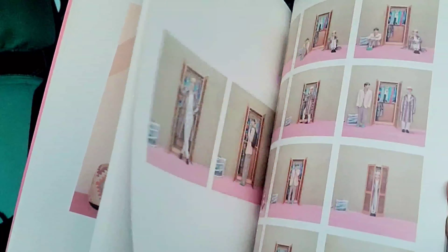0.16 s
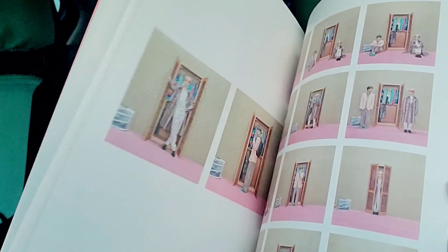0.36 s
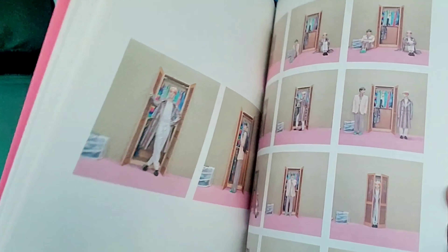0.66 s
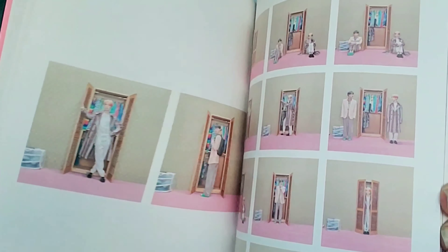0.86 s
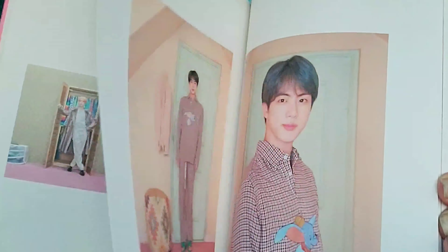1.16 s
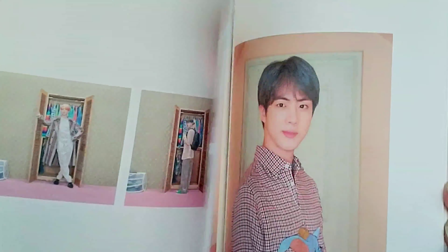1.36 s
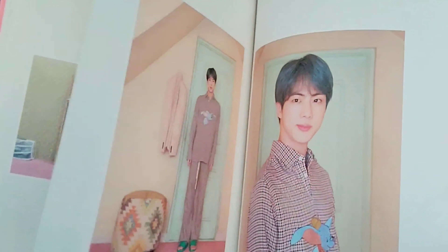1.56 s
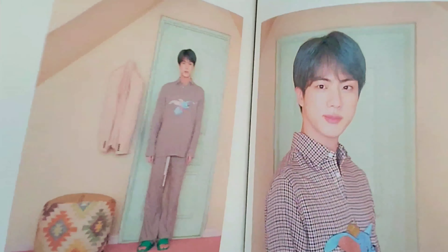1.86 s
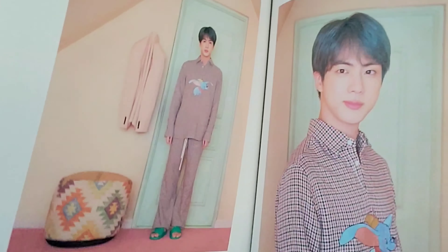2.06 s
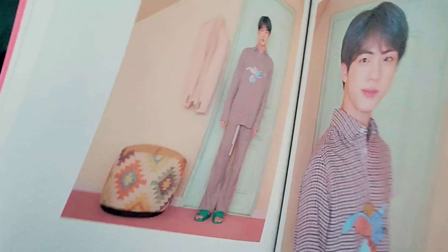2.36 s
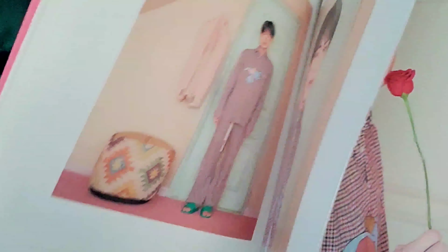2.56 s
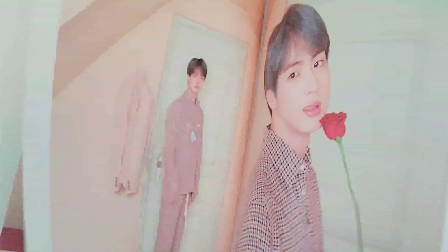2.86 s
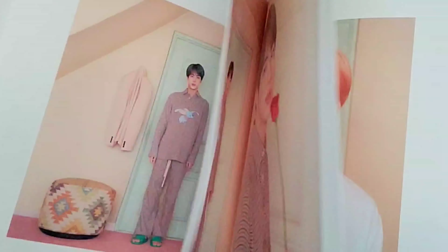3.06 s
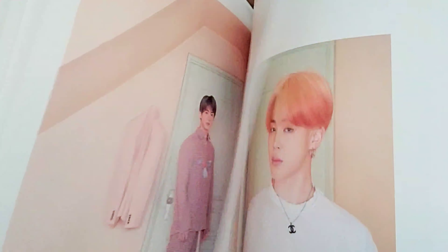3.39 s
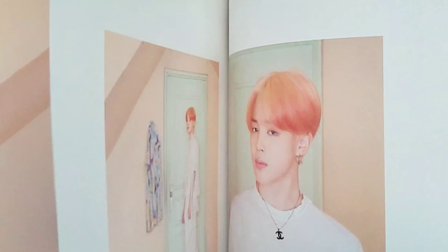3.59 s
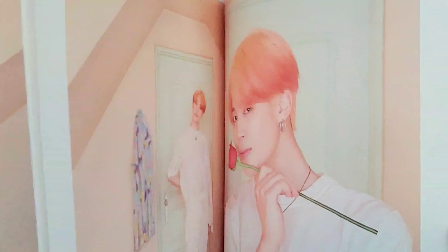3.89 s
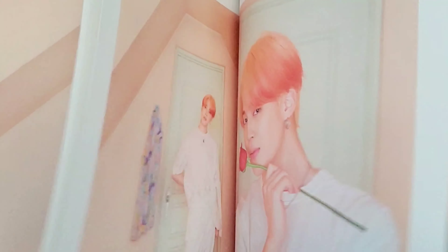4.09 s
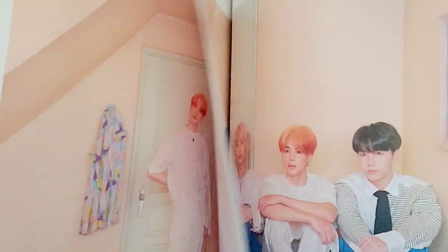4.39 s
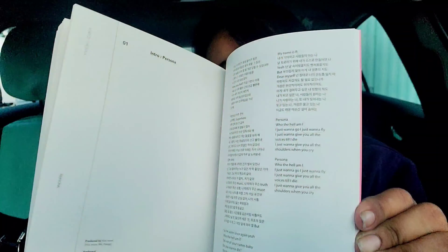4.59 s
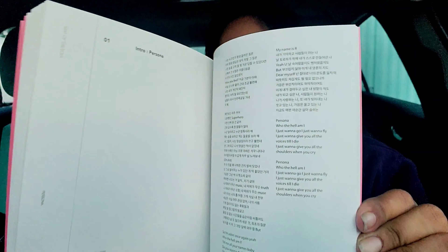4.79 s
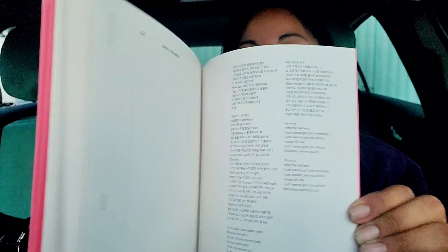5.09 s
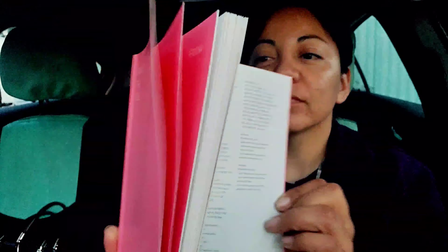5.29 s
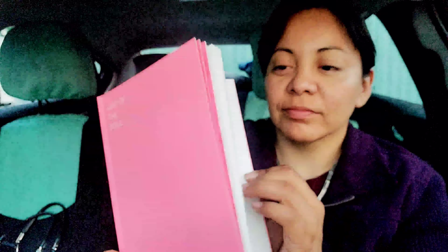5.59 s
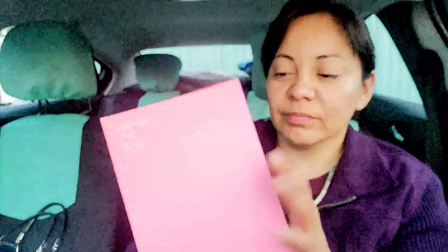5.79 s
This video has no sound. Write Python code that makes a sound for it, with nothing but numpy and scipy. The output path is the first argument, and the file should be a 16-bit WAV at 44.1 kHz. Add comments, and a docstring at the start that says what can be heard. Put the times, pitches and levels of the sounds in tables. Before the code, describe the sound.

Someone leafs through a book of thick, shiny paper right beside the microphone. Irregular swishes and rustles swell and fade, dotted with crisp clicks as pages buckle and low, soft thumps as they fall. A loud cluster of snaps comes near the middle, and a last slide and slap close the book. Behind it lies only the very faint steady noise of a parked car's interior.

```python
"""Stiff glossy book pages slide over a thumb and each other, close to a phone in a parked car.
The paper sticks and slips in tiny grains that make the sheet ring, hiss and sometimes rasp.
Pages click as they buckle, snap free and flop down, and the air they push thumps in the cabin.
Under it all lies a faint steady noise. The hits get a short padded echo, and the phone's two
microphone openings colour the left and right sides differently."""
import sys
import numpy as np
from scipy import signal
from scipy.fft import rfft, irfft, next_fast_len
from scipy.io import wavfile
from scipy.ndimage import uniform_filter1d, map_coordinates

SR = 44100
rng = np.random.default_rng(int(sys.argv[2]) if len(sys.argv) > 2 else 0)


def wav_record(signal):
    """Record a signal, one row per channel, as 16-bit PCM in the file named by sys.argv[1]."""
    frames = np.transpose(np.atleast_2d(signal))
    bounded = np.clip(frames, -1, 1)
    # unit amplitude maps onto the largest positive 16-bit level
    quanta = np.round(bounded * 32767).astype(np.int16)
    wavfile.write(sys.argv[1], SR, quanta)


N = 261954


def amp(db):
    """Turn decibels into a gain to multiply by."""
    return 10 ** (np.asarray(db) / 20)


def unit(x):
    """Scale x to an average (rms) level of 1."""
    return x / np.sqrt(np.mean(x ** 2) + 1e-20)


def along(points, hz):
    """Read between (frequency, value) points, with octaves evenly spaced."""
    freqs, values = np.transpose(points)
    return np.interp(np.log(hz + 1), np.log(freqs + 1), values)


def wobble(rate):
    """A smooth random curve through `rate` points a second."""
    return map_coordinates(rng.standard_normal(N // 40), [np.arange(N) * rate / SR])


def filtered(x, response):
    """Shape x with a filter, given as a function of frequency."""
    size = next_fast_len(N + SR // 2)
    return irfft(rfft(x, size) * response(np.fft.rfftfreq(size, 1 / SR)), size)[..., :N]


def resonances(table):
    """A filter that rings at each (pitch, width, level) row of a table."""
    return lambda f: sum((-1) ** k * amp(db) * 1j * f * width / (hz * hz - f * f + 1j * f * width)
                         for k, (hz, width, db) in enumerate(table))


def sides(db):
    """Left and right gains that make the left side louder by db."""
    return 2 / (amp(db / 2) + amp(-db / 2)) * amp(np.vstack([db, -db]) / 2)


def add_at(track, start_s, sound):
    """Mix a sound into a stereo track at a given time."""
    track[:, round(start_s * SR):][:, :sound.shape[-1]] += sound


def swells(peak_s, peak_db, rise_s, fall_s, rest_db):
    """A gain that climbs 20 dB in rise_s up to each peak and sinks 20 dB in fall_s after it."""
    steps = np.arange(0, N, 64)
    late_s = steps / SR - peak_s[:, None]
    drop_db = 20 * np.where(late_s < 0, -late_s / rise_s[:, None], late_s / fall_s[:, None])
    power = amp(2 * (peak_db[:, None] - drop_db)).sum(axis=0)
    return np.interp(np.arange(N), steps, np.sqrt(power + amp(2 * rest_db)))


# How alike the left and right sides sound: (frequency [Hz], likeness [0 to 1])
LIKENESS = [(60, 0.66), (290, 0.63), (640, 0.07), (1300, 0.52), (3100, 0.046), (6800, 0.029),
            (15000, 0.067)]

def grains(colour, spiky_db, clump_db, clumps_per_s, patchy_db):
    """Sticking and slipping: a dense stream of tiny, uneven kicks that come in clumps."""
    spikes = np.minimum(rng.exponential(size=N), 6.0)
    size = amp(spiky_db * spikes + clump_db * wobble(clumps_per_s))
    spectrum = signal.stft(size * rng.standard_normal((2, N)), nperseg=256)[2]
    # as the paper bends, patches of its spectrum swell and fade
    patches = uniform_filter1d(rng.standard_normal(spectrum.shape[1:]), size=2, axis=0)
    patches = uniform_filter1d(patches, size=16, axis=1)
    pair = signal.istft(spectrum * amp(patchy_db * unit(patches)), nperseg=256)[1][:, :N]
    spread = lambda hz: np.arccos(along(LIKENESS, hz)) / 2
    mid, side = filtered(pair, lambda hz: colour(hz) * [np.cos(spread(hz)), np.sin(spread(hz))])
    return np.array([mid + side, mid - side]) / np.sqrt(np.mean(mid ** 2 + side ** 2) * 0.81)


# The tone of the quiet car: (frequency [Hz], relative level [dB])
QUIET_TONE = [(15, -27.5), (25, -10), (64, -2), (180, -14.5), (242, -9.5), (405, -15.5), (531, -15),
              (1370, -24.5), (1700, -16.5), (2050, -18.5), (4030, -24.5), (7710, -33.5), (10100, -30),
              (14800, -23.5), (16000, -34)]

def quiet_cabin():
    """The faint steady noise of the cabin and the microphones."""
    noise = filtered(rng.standard_normal((2, N)), lambda hz: amp(along(QUIET_TONE, hz)))
    return amp(-79.5) * unit(noise)


# How fast the seats soak up sound: (frequency [Hz], time to fade by 60 dB [s])
ECHO_TIMES = [(100, 0.19), (1000, 0.035), (10000, 0.083)]

def cabin_echo(x):
    """The padded cabin adds a short echo, each frequency dying at its own speed."""
    hz, t, spectrum = signal.stft(rng.standard_normal((2, SR // 4)), SR, nperseg=256)
    fade = amp(-60 * t / along(ECHO_TIMES, hz)[:, None])
    tail = signal.istft(spectrum * fade, SR, nperseg=256)[1]
    delayed = np.pad(x, ((0, 0), (90, 0)))
    return signal.fftconvolve(delayed, tail / np.linalg.norm(tail[0]), axes=1)[:, :N]


# Where the cabin's air booms and a page trembles: (pitch [Hz], width [Hz], relative level [dB])
CABIN_BOOM = [(47.7, 37.5, -4.5), (56.4, 23.5, 1), (84.4, 16.8, -1.5), (121, 32, -6.5), (172.4, 44, -6.5)]
PAGE_FLUTTER = [(295.4, 190, -7.5), (393, 177, 1.5), (551, 250, -2), (758, 500, -4.5)]
# Puffs of air: (time [s], thump [dB], flutter [dB], thump's 20 dB fade time before limiting [s])
AIR_PUFFS = [(.1, -63, -91, 0.13), (0.347, -61, -66.5, 0.4), (0.485, -62, -56.5, 0.2),
             (0.556, -49, -59, 0.06), (.72, -79, -62.5, -0.34), (0.877, -62.5, -70, 0),
             (1.111, -58, -60.5, 0.18), (1.447, -56, -58.5, 0.23), (1.581, -59, -87, 0.15),
             (1.689, -52, -54, -0.02), (1.843, -52, -55, 0.14), (2.152, -69, -53.5, -0.25),
             (2.196, -58.5, -53.5, 0.07), (2.301, -64.5, -81, 0.2), (2.794, -76, -57.5, 0.07),
             (2.889, -47, -52, 0.21), (2.96, -61, -76, 0.3), (3.194, -59.5, -62.5, 0.37),
             (3.267, -41, -42.5, -0.03), (3.33, -38.5, -42, 0.0548), (3.69, -66, -78.5, 0.8),
             (3.871, -58, -76, -0.26), (4.1, -65.5, -73.5, 1.1), (4.179, -47.5, -51, -0.07),
             (4.33, -69, -59.5, -0.04), (4.438, -46.5, -46.5, 0.1148), (4.468, -49, -62, -0.03),
             (5.229, -63.5, -57, 0.34), (5.278, -43.5, -72, 0.07), (5.38, -58.5, -90, 0.16),
             (5.641, -59.5, -60.5, 0.1), (5.76, -63.5, -67, 1), (5.883, -44, -50, 0.16)]

def air_puffs():
    """Swinging pages push air in uneven puffs that ring the cabin and shake the paper."""
    peak_s, thump_db, flutter_db, fall_s = np.transpose(AIR_PUFFS)
    fall_s = np.clip(fall_s, 0.02, 1)
    rise_s = 0.47 * fall_s
    flutter_share = 0.58  # the flutter is shorter than the thump
    thump = grains(lambda f: resonances(CABIN_BOOM)(f) / (1 + (f / 260) ** 4),
                   spiky_db=0.54, clump_db=2.5, clumps_per_s=8.3, patchy_db=-1.8)
    flutter = grains(resonances(PAGE_FLUTTER), spiky_db=1.5, clump_db=2.2, clumps_per_s=60, patchy_db=1.8)
    thump *= swells(peak_s, thump_db, rise_s, fall_s, rest_db=-80)
    flutter *= swells(peak_s, flutter_db, flutter_share * rise_s, flutter_share * fall_s, rest_db=-90)
    return sides(11.4) * thump + sides(8.1) * flutter


# A page or the cover lands: (time [s], level [dB], pitch [Hz])
LANDINGS = [(0.325, -55, 96), (0.559, -46, 53), (1.094, -48, 92), (1.116, -43.5, 174.3),
            (1.132, -51, 180.4), (1.435, -42.5, 59), (1.822, -39, 170), (1.847, -46, 97.5),
            (2.777, -43.5, 77.5), (2.95, -49, 84), (3.273, -33.5, 63), (3.316, -41, 88.5),
            (4.116, -45.5, 58), (4.159, -39.5, 55), (4.455, -42, 81), (5.226, -44, 88), (5.359, -46.5, 74),
            (5.893, -34.5, 78)]

def page_flops():
    """Landing paper squeezes out its air: a soft push that rings low for a few cycles."""
    out, t = np.zeros((2, N + SR)), np.arange(SR // 2) / SR
    for start_s, db, hz in LANDINGS:
        right_lag = rng.normal(0, 1.0) * np.array([[0], [1]])  # the two sides are out of step
        fade = amp(db - 60 * t / 0.14) * (1 - np.exp(-(t / 0.0058) ** 2))
        add_at(out, start_s, sides(12.5) * fade * np.sin(2 * np.pi * hz * t - right_lag))
    return out[:, :N]


# A bent page pops through: (time [s], level [dB])
BUCKLES = [(1.4282, -48), (1.8222, -34), (2.2834, -54.5), (3.6673, -43), (4.0493, -46), (5.043, -65)]

def buckle_clicks():
    """A buckling page gives a dry click: a tiny burst of noise with little bass."""
    out, t = np.zeros((2, N + SR)), np.arange(SR // 50) / SR
    for start_s, db in BUCKLES:
        noise = rng.standard_normal((3, len(t)))  # left, right, shared
        fade = amp(db - 60 * t / 0.0061) * (1 - np.exp(-t / 0.00041))
        add_at(out, start_s, 2 * fade * (noise[:2] + 0.49 * noise[2]))
    return filtered(out[:, :N], lambda f: 1j * f / (2500 + 1j * f))


# Where a page rings: low when much paper hangs free, higher at the edge and corner near the thumb.
# (pitch [Hz], width [Hz], relative level [dB])
SHEET_RINGS = [(1670, 630, -9.5), (2164, 90, 6.5), (2179.6, 107, 6), (2642, 264, -3), (2975, 203, -6)]
EDGE_RINGS = [(3235, 90, -1.5), (3514, 96, -0.5), (3800, 197, -2), (4506, 500, -6.5)]
CORNER_RINGS = [(5060, 760, -10), (5770, 345, -1.5), (5990, 760, -6)]
# A page edge snaps free or lands; the last three columns turn its parts up or down.
# (time [s], level [dB], pitch [Hz], time to fade by 60 dB [s], crack [dB], tick [dB], thud [dB])
EDGE_SNAPS = [(.028, -67.5, 3000, 0.014, 5, -18, -27), (0.157, -49, 1140, 0.03, -12, -6.5, -11),
              (0.5525, -23, 1313, 0.024, -4, -21.5, -46), (0.559, -37, 5900, 0.04, -10, -24.5, -35),
              (0.669, -66, 2900, .02, -5, -20, -30), (0.7076, -51.5, 1170, 0.022, -2, -37, -22),
              (.736, -59, 4440, .02, 3, -22, -40), (0.766, -49.5, 2800, 0.064, -6, -25, -40),
              (0.8763, -43, 3530, 0.012, 5.5, -13, -25), (0.907, -55, 3270, .03, 5, -18, -38),
              (0.922, -51.5, 3180, 0.018, 2, -18, -40), (.96, -52, 3780, 0.025, -1.5, -23, -41),
              (1.048, -64.5, 1094, 0.067, -13, -20, -7), (1.3592, -56, 2260, 0.035, -7, -24.5, -10),
              (1.428, -29, 3010, 0.011, 0.5, -25, -16.5), (1.443, -50, 3200, 0.036, -11, -13, -22),
              (1.6994, -43.5, 3740, 0.02, -2, -26.5, -4), (1.8227, -21.5, 1826, 0.01, -3, -34, -19.5),
              (1.8284, -38, 1000, 0.015, -3, -22, 1), (2.284, -53.5, 3680, 0.014, 8.5, -11, -23),
              (2.606, -52, 1240, 0.042, -31, -31.5, -39), (2.6335, -53.5, 1217, 0.066, 5, -32, -34),
              (2.816, -45.5, 3020, 0.0092, 4, -17.5, -30), (2.858, -36, 3570, 0.023, -1.5, -20.5, -23),
              (2.879, -40, 3000, 0.011, -12, -30, -33), (2.895, -36.5, 1163, 0.06, 0, -18, -10),
              (3.031, -55, 3720, 0.025, -16, -27.5, -20), (3.1827, -59, 3850, 0.017, 2, -10, -11),
              (3.2675, -29.5, 1140, 0.022, -3.5, -20, -18), (3.278, -16, 1200, 0.023, -11, -41, -20),
              (3.3234, -27, 1204, 0.0089, -7, -32, -5), (3.3341, -22, 1116, 0.025, -34.5, -45, -12.5),
              (3.337, -12, 1165, 0.016, -22, -50, -28), (3.3446, -29.5, 1220, 0.013, -25, -44, -25),
              (3.6365, -46.5, 5870, 0.017, -14, -20.5, -40), (3.6396, -41.5, 5100, 0.017, -9, -16.5, -30),
              (3.6437, -48, 4600, 0.013, -17, -17, -40), (3.6667, -29.5, 1200, 0.022, -1.5, -30, -43),
              (3.826, -61, 3050, 0.012, -6, -12, -8), (4.048, -53, 3300, 0.0078, -4, -9, -25),
              (4.165, -55.5, 1600, 0.026, -20, -30, 9), (4.176, -41.5, 2220, 0.049, -7, -18.5, -7),
              (4.3268, -39.5, 2920, .02, -0.5, -21.5, -20), (4.382, -37, 2550, 0.045, -8.5, -28, -32),
              (4.429, -31, 1660, 0.038, 1.5, -13, -6.5), (4.669, -46.5, 3750, 0.022, -23, -5.5, -19),
              (4.7733, -58, 3080, 0.023, 1, -13.5, -12.5), (5.2526, -43, 1130, 0.015, -13, -16, 0),
              (5.2272, -41.5, 1990, 0.0078, 0, -18, -6), (5.285, -48, 1150, .02, -10, -30, -15),
              (5.6498, -46, 1730, 0.033, -21, -32, -3), (5.748, -42, 804, 0.038, -11.5, -36, -7.5),
              (5.7523, -33.5, 1336, 0.036, -30, -60, -14.5), (5.8733, -36.5, 1340, 0.029, 5, -9, -13),
              (5.8851, -27, 890, 0.024, -0.5, -27, -4.5)]

def page_snaps():
    """A snapping edge gives a short ring, a crack through the sheet, a high tick and a dull thud."""
    out, rings, cracks = np.zeros((3, 2, N + SR))
    t, pan = np.arange(SR // 8) / SR, sides(11)
    for start_s, db, hz, ring_s, crack_db, tick_db, thud_db in EDGE_SNAPS:
        noise = rng.standard_normal((4, len(t)))
        fade = amp(db - 60 * t / ring_s) * (1 - np.exp(-t / 0.0013))
        ring = np.sin(2 * np.pi * hz * t + np.cumsum(0.13 * noise[2]))  # random drift blurs the pitch
        crack = amp(crack_db + 17 - 60 * t / 0.016) * (noise[3] + 0.23 * noise[:2])
        tick_fade = amp(db + tick_db + 1.5 - 60 * t / 0.044) * (1 - np.exp(-t / 0.0014))
        tick = tick_fade * np.diff(noise[:2], prepend=0)
        thud_hz = 363.5 * np.exp(0.14 * rng.standard_normal())
        thud_phase = 2 * np.pi * thud_hz * t / (1 + t / 0.062)  # the pitch falls as the air escapes
        thud = amp(db + thud_db - 60 * t / 0.028) * np.sin(thud_phase + np.cumsum(0.061 * noise[3]))
        add_at(out, start_s, pan * thud + tick)
        add_at(rings, start_s, pan * fade * ring)
        add_at(cracks, start_s, pan * fade * crack)
    thin = lambda f: (1j * f) ** 2 / (800 ** 2 + 1.2j * 800 * f - f * f)  # a sheet gives off no bass
    paper = resonances(SHEET_RINGS + EDGE_RINGS + CORNER_RINGS)
    return out[:, :N] + filtered(rings[:, :N], thin) + filtered(cracks[:, :N], paper)


# A dragged page sings out: (time [s], length [s], first pitch [Hz], last pitch [Hz], level [dB])
DRAG_RASPS = [(0.14, 0.06, 5960, 5890, -54), (0.153, 0.031, 4630, 4680, -59), (0.191, 0.1, 3730, 3950, -59),
              (0.229, 0.05, 4360, 4380, -69), (0.319, 0.093, 4200, 4510, -59.5),
              (0.369, 0.047, 3650, 3370, -63), (0.384, 0.029, 5900, 5860, -61),
              (.15, 0.14, 1150, 1208, -68.5), (0.463, 0.093, 1218, 1240, -63),
              (0.659, 0.03, 1280, 1290, -79), (0.697, 0.11, 1250, 1256, -59),
              (0.803, 0.081, 3320, 3340, -63), (1.154, 0.12, 3300, 3290, -83),
              (1.59, 0.12, 1177, 1145, -68.5), (1.603, 0.16, 3790, 3730, -68),
              (2.273, 0.17, 3510, 3520, -62), (2.356, 0.089, 4530, 5000, -60.5),
              (2.745, 0.045, 4710, 4660, -59.5), (2.888, .02, 5600, 5400, -54),
              (2.898, 0.069, 1195, 1166, -60.5), (3.199, 0.061, 3810, 3880, -62),
              (3.833, 0.073, 4600, 4520, -70), (4.062, .06, 4560, 4650, -61),
              (4.075, 0.037, 6200, 6170, -64.5), (4.096, 0.13, 3890, 3646, -56.5),
              (4.238, 0.23, 3930, 3820, -63.5), (4.33, 0.111, 2750, 2560, -54),
              (4.351, 0.11, 1210, 1210, -57.5), (4.62, 0.098, 1234, 1270, -67.5),
              (4.623, .12, 3960, 3670, -66), (4.987, 0.096, 1240, 1300, -80),
              (5.076, 0.14, 5050, 4900, -76.5), (5.215, .048, 1715, 1704, -52.5),
              (5.281, 0.23, 5330, 4870, -71)]

def page_rasps():
    """One resonance of a dragged sheet rasps, gliding as the free length of paper changes."""
    out = np.zeros((2, N + SR))
    width_share = 0.055  # width of the noise band as a share of its first pitch
    for start_s, length_s, first_hz, last_hz, db in DRAG_RASPS:
        progress = np.linspace(0, 1, round(length_s * SR))
        noise = rng.standard_normal((2, 2, SR // 4))[..., :len(progress)]
        smoothing = np.exp(-np.pi * width_share * first_hz / SR)
        slow_noise = signal.lfilter([1], [1, -smoothing], noise[0] + 1j * noise[1])
        slow_noise *= np.sqrt(1 - smoothing ** 2)
        glide = np.exp(2j * np.pi * np.cumsum(first_hz + (last_hz - first_hz) * progress) / SR)
        swell = amp(db) * np.sin(np.pi * progress) ** 0.38
        add_at(out, start_s, swell * (slow_noise * glide).real)
    return sides(9.7) * out[:, :N]


# The page's belly, where the whole sheet bends: (pitch [Hz], width [Hz], relative level [dB])
BELLY_RINGS = [(1114, 65, 4), (1234, 483, 0.5), (1412, 450, -10)]
# The tone of the fine rubbing hiss: (frequency [Hz], relative level [dB])
HISS_TONE = [(3530, -32), (6000, -11.5), (7740, -14), (9010, -5), (10800, -0.5), (13900, -6), (15200, -6.5),
             (16000, -34.5)]
# One row for each stroke of sliding paper, with its base settings and its path through time:
# (edge over rub [dB], corner over rub [dB], left over right [dB], path)
# Each point of a path: (time [s], level [dB], hiss over level [dB], belly over rub [dB])
STROKES = [ (4, -4, 11, [(0.0, -80.5, -10, 18), (0.116, -85, -9, 6), (0.135, -68.5, -10, 0)]),
           (6, -5, 7.5, [(0.148, -59, -8.5, 12), (0.16, -54.5, -8.5, 8), (0.186, -60.5, -3.5, 2),
           (0.298, -60.5, -14.5, 5), (0.312, -67, -8, 10), (0.352, -53, -2.5, 8.5),
           (0.442, -59.5, -10, 1.5), (0.45, -56, -15, 6)]), (1, -3, 7, [(0.458, -50.5, -10, 3),
           (0.518, -43, -11.5, 0.5), (0.538, -46.5, -10, 5)]), (1.5, -5, 7.5, [(0.547, -40, -14, 4),
           (0.565, -37, -12, 1.5), (0.578, -43.5, -10, 0.5), (0.592, -45, -11, -7), (0.603, -52, -20, 1),
           (0.641, -86, 4, -5), (0.695, -77, -13, 10)]), (1.5, -3.5, 9, [(0.705, -64.5, -15.5, 4),
           (.76, -62.5, -16, 1), (0.787, -52, -22, -3), (0.803, -63, -11, 3), (0.833, -58.5, -20, 0),
           (0.88, -52, -8, 2), (.888, -58, -6.5, 2), (0.931, -73, -2, -1), (0.95, -83, -1, -1)]),
           (-3, -6, 10, [(0.98, -92, -5, 0), (0.982, -80, -5, -5), (1.04, -93, -2, -4)]),
           (4.5, -7, 14, [(1.048, -76, -5, 2), (1.078, -83, -6, -17.5), (1.142, -62.5, -9.5, -5),
           (1.23, -64, -1.5, -3), (1.284, -84, 4, 3), (1.345, -93, 4, -6)]),
           (0.5, -13, 7.5, [(1.355, -65.5, -10, 2), (1.42, -62, -14, -6)]),
           (-2, -5.5, 10.5, [(1.44, -47.5, -4.5, 2.5), (1.462, -66, -0.5, -5), (1.546, -71.5, -1.5, -11),
           (1.646, -57, -13.5, -3), (1.73, -63.5, -8, -1), (1.756, -51.5, -10, -6.5), (1.794, -64, -4, -9),
           (1.812, -65.5, -2, -6)]), (-4.5, -5, 6, [(1.84, -58, -12, -9), (1.874, -69, -0.5, -13),
           (1.972, -56.5, -4.5, -4), (2.018, -67.5, -9, -3), (2.116, -45.5, -11.5, -8),
           (2.19, -43.5, -9, 1), (2.254, -76, -1, -2.5), (2.27, -65.5, -10.5, -4)]),
           (2.5, -4, 9, [(2.287, -61, -8, 16), (2.295, -62, -17.5, 4), (2.351, -48.5, -15, -5.5),
           (2.439, -58.5, 0.5, 5.5), (2.479, -55.5, -9, 0.5), (2.555, -74.5, -5.5, 2),
           (2.603, -70.5, -24, 9), (2.723, -63.5, -7, -2), (2.732, -77.5, 0, -0.5)]),
           (0, -7, 9, [(2.745, -60, -17, -5), (2.778, -51.5, -16, -4.5), (2.808, -56.5, -11.5, -1),
           (2.894, -44.5, -14.5, -3.5), (2.948, -57, -4, -2.5), (3.02, -81, -4, -16)]),
           (3, -4, 7, [(3.035, -58, -5.5, -2.5), (3.059, -69, -6, -4), (3.133, -70.5, -16, 1),
           (3.172, -93, 3, -2)]), (-2, -4.5, 9, [(3.187, -57, 1, 6), (3.193, -57.5, -6, -7),
           (3.255, -48.5, -8, -3), (3.268, -41.5, -9, 0.5)]), (-8.5, -19, 7.5, [(3.289, -36.5, -19, -6),
           (3.3, -34.5, -17, -6.5), (3.312, -35.5, -17.5, -4.5), (3.322, -43.5, -18, -5.5)]),
           (0.5, -5, 8, [(3.356, -55, -19, 4), (3.438, -53, -15, -1.5), (3.45, -64, -12, -2),
           (3.49, -48.5, -19, -2), (3.61, -69, -11, -2), (3.644, -58, -7, -2), (3.655, -61, -8, -4.5)]),
           (7, -3, 6, [(3.684, -58.5, -9, 8), (3.738, -75, -11, 13), (3.77, -67, -18, -13.5),
           (3.82, -82.5, -7.5, -9)]), (0.5, -2.5, 8.5, [(3.83, -68.5, -3.5, -5), (3.968, -77, -7, 5.5),
           (4.054, -53.5, -8, -6.5), (4.064, -64, -4.5, -4), (4.148, -58, -11, -7), (4.182, -46.5, -5.5, 2),
           (4.22, -57, -12, 1.5), (4.23, -70, -12, 3)]), (-4.5, -13, 5.5, [(4.24, -59.5, -12.5, -5),
           (4.36, -47.5, -10.5, -3.5), (4.426, -41, -19, 2.5), (4.455, -42.5, -9, 1.5),
           (4.464, -51, -13, 1), (4.518, -71.5, -8, -7), (4.55, -79.5, -3, -7)]),
           (-1, -7, 8, [(4.572, -65, -13, 4.5), (4.622, -58, -12.5, -4), (4.66, -54.5, -13, -2),
           (4.755, -68.5, -5, -3), (4.772, -59.5, -8, -9), (4.786, -62.5, -7, 0), (4.8, -70, -13, 9),
           (4.812, -64, -24, 0), (4.848, -62.5, -25.5, 2), (4.866, -75.5, -14, 4)]),
           (-2.5, -8, 9, [(4.874, -79.5, -7.5, 1), (4.94, -90.5, 6, 0), (4.98, -93, -3.5, 4),
           (5.036, -76.5, -12, 5)]), (-0.5, 3, 7.5, [(5.045, -69.5, -13, 8.5), (5.131, -61, -2.5, -2.5),
           (5.161, -61.5, -7.5, 2.5), (5.231, -45.5, -6.5, 2), (5.257, -44.5, -5.5, 3),
           (5.269, -64.5, -3, -13), (5.343, -55.5, -12.5, 9), (5.387, -72, 0, -2.5),
           (5.59, -69.5, -4.5, -7)]), (1.5, -9, 6, [(5.612, -61, -14, -5), (5.638, -56, -18, 2),
           (5.696, -57.5, -6.5, 2), (5.74, -68.5, -2, 3)]), (2.5, -5.5, 4.5, [(5.778, -58, -17, 9),
           (5.803, -66, -13, 7), (5.822, -55, -19, 6), (5.841, -52, -23, 6), (5.875, -45, -7, -0.5),
           (5.929, -55.5, -12, 5), (5.94, -60, -2, -8)]), ]

def sliding_pages():
    """Rubbing paper sticks and slips, ringing the sheet, its edge, corner and belly, with a fine hiss."""
    strokes = [np.array([(*point, *settings) for point in path]) for *settings, path in STROKES]
    onset_s = 0.006  # each stroke holds its last values until the next sets in, this quickly
    held = [np.vstack([stroke, np.r_[following[0, 0] - onset_s, stroke[-1, 1:]]])
            for stroke, following in zip(strokes, strokes[1:])]
    times, *columns = np.vstack(held + [strokes[-1]]).T
    curves = [np.interp(np.arange(N) / SR, times, column) for column in columns]
    level_db, hiss_db, belly_db, edge_db, corner_db, pan_db = curves
    # harder rubbing sounds duller and more central; more belly also means less edge and corner
    usual_db = -62
    harder_db = level_db - usual_db
    edge_db -= 0.08 * harder_db + 0.44 * belly_db
    corner_db -= 0.196 * harder_db + 0.203 * belly_db
    pan_db -= 0.06 * harder_db
    # a thin sheet gives off little sound below its lowest resonance
    rub = grains(lambda f: resonances(SHEET_RINGS)(f) / np.sqrt(1 + (1050 / (f + 1)) ** 6),
                 spiky_db=3, clump_db=1.5, clumps_per_s=150, patchy_db=2)
    edge = grains(resonances(EDGE_RINGS), spiky_db=0.5, clump_db=2.5, clumps_per_s=76, patchy_db=1)
    corner = grains(resonances(CORNER_RINGS), spiky_db=2, clump_db=2.5, clumps_per_s=100, patchy_db=2)
    belly = grains(lambda f: resonances(BELLY_RINGS)(f) / np.sqrt(1 + (1030 / (f + 1)) ** 12),
                   spiky_db=2.5, clump_db=2, clumps_per_s=70, patchy_db=3)
    hiss = grains(lambda f: amp(along(HISS_TONE, f)),
                  spiky_db=2, clump_db=1, clumps_per_s=150, patchy_db=3)
    tremble = grains(resonances(PAGE_FLUTTER), spiky_db=-1.5, clump_db=1, clumps_per_s=41, patchy_db=-0.5)
    crinkle = grains(lambda f: (f / 1500) ** 2 / (1 + (f / 1500) ** 2) / (1 + (f / 6500) ** 4),
                     spiky_db=5, clump_db=0.5, clumps_per_s=27, patchy_db=0.5)  # sparse dry ticks
    paper = rub + amp(edge_db) * edge + amp(corner_db) * corner + amp(belly_db) * belly
    paper += amp(-18.5) * tremble + amp(-12) * crinkle
    # rub, edge, corner and belly share the stroke's level
    paper *= amp(level_db) / np.sqrt(1 + amp(2 * edge_db) + amp(2 * corner_db) + amp(2 * belly_db))
    hiss *= amp(level_db + hiss_db)
    # the hiss reaches both microphones almost alike; the rest is shadowed on one side
    return sides(pan_db) * paper + sides(0.28 * pan_db) * hiss


def scene():
    """Mix paper, air and cabin; only the snaps, clicks and flops get an echo."""
    hits = page_snaps() + buckle_clicks() + page_flops()
    rubbing = sliding_pages() + page_rasps()
    return rubbing + air_puffs() + hits + amp(-3) * cabin_echo(hits) + quiet_cabin()


# How the phone's two microphone openings differ: (frequency [Hz], left over right [dB])
MIC_BALANCE = [(60, -8), (700, -3), (1290, -2), (2380, 2.5), (4400, 3), (8120, -8), (15000, 1)]

def record(dry):
    """Each opening colours its own side; both have a dip in the treble and lose the very top."""
    dip_hz, dip_width_hz, top_hz = 7500, 1500, 15800
    balance = lambda f: amp(np.array([[0.5], [-0.5]]) * along(MIC_BALANCE, f))
    dip = lambda f: 1 - 0.66 * resonances([(dip_hz, dip_width_hz, 0)])(f)
    return filtered(dry, lambda f: balance(f) * dip(f) * (f < top_hz))


dry = scene()
out = record(dry)
wav_record(out)
```